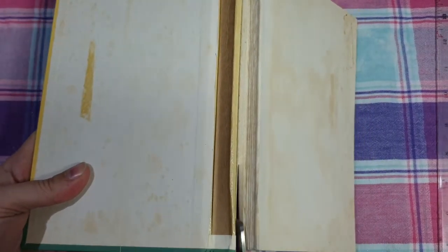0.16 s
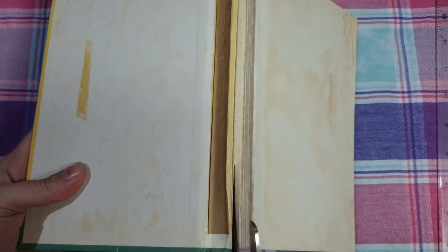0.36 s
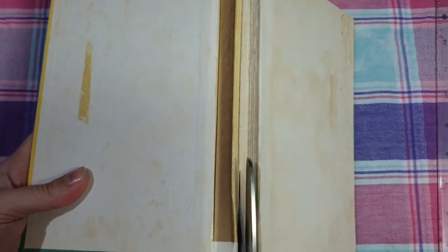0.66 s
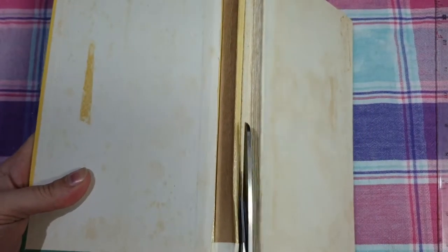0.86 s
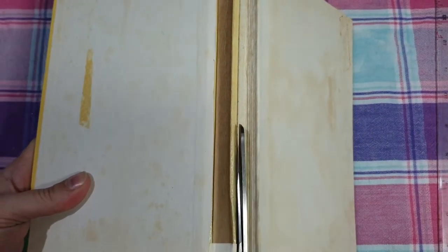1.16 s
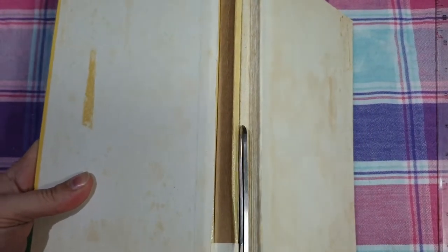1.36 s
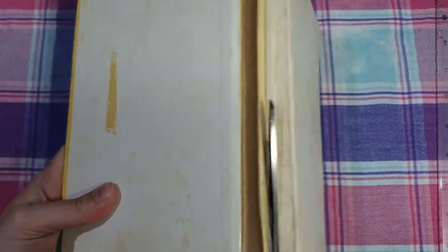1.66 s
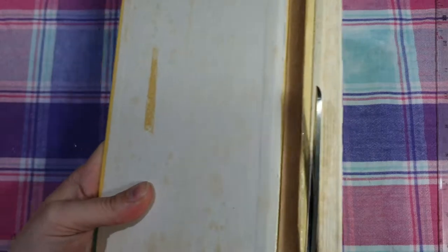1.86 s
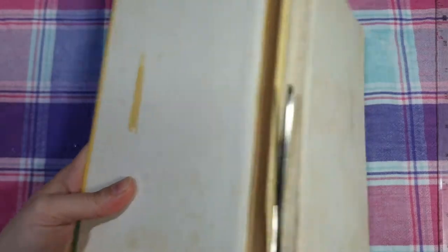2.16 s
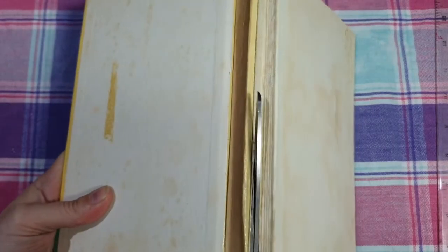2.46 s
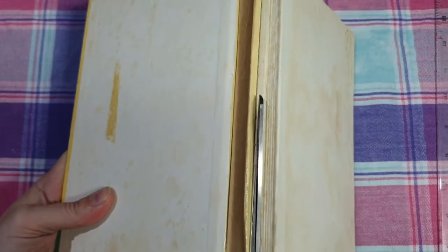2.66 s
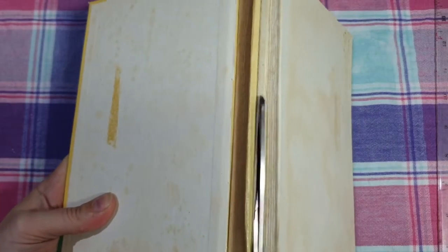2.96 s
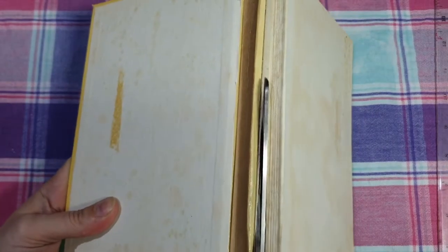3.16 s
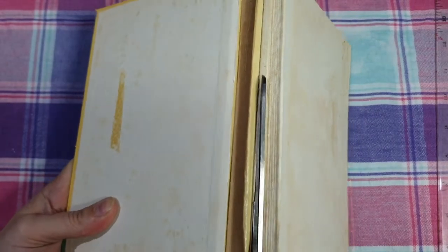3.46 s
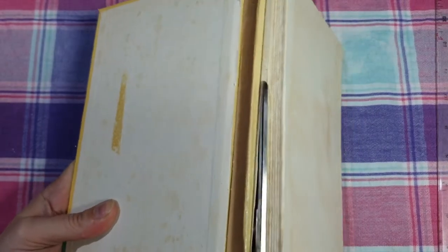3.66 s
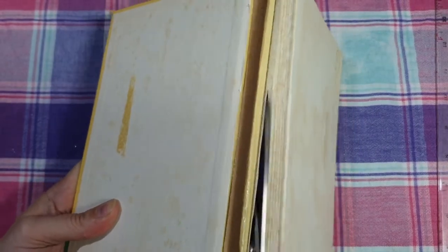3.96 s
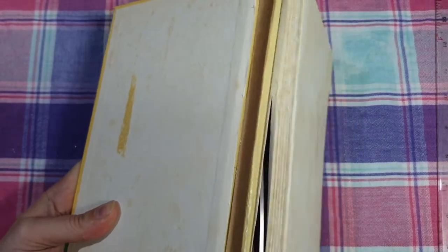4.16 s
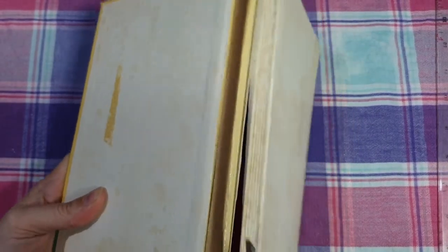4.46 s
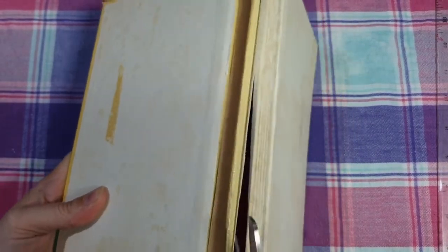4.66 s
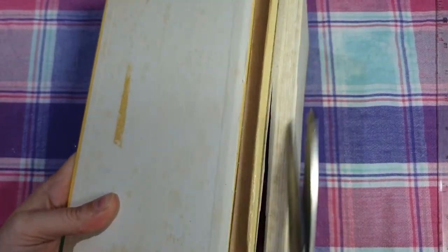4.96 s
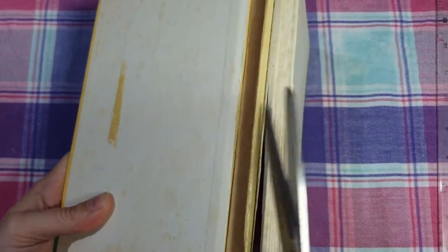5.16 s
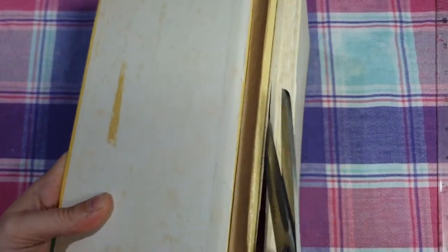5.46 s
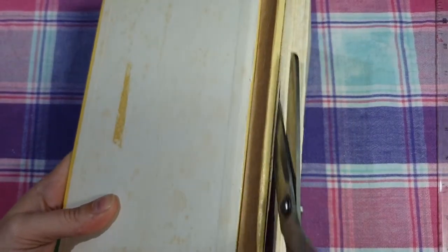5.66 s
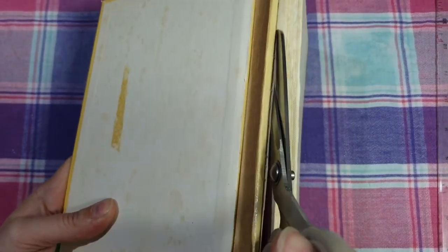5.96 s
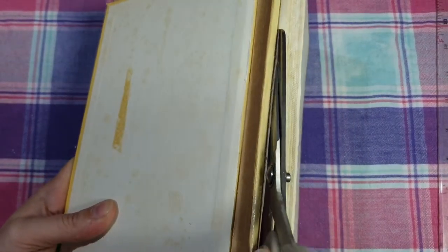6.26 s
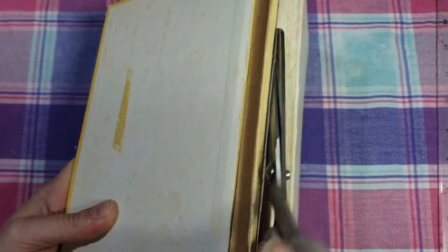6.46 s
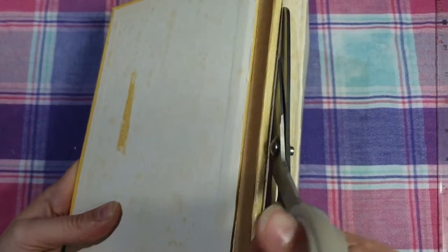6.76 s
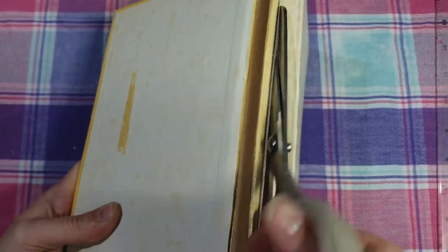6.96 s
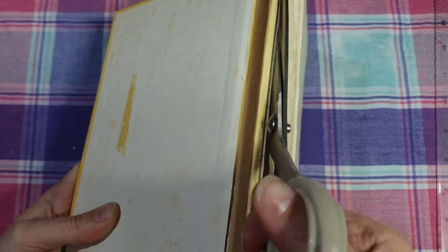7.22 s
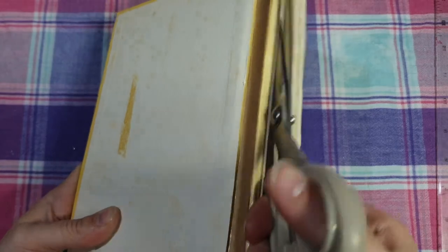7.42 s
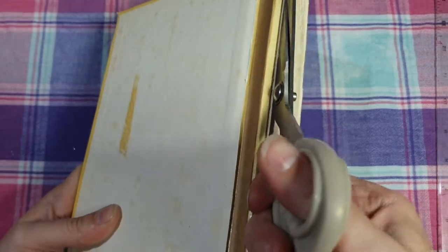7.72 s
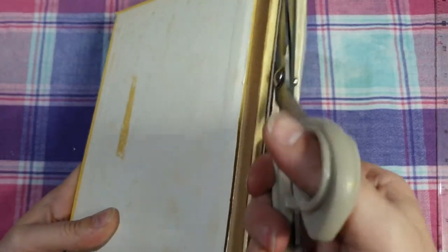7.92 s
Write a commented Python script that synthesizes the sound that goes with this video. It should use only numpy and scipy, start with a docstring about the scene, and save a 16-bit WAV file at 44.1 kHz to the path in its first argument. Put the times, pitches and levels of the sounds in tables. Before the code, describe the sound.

Close up, steel blades slide against paper and clack lightly, then bite into a book's binding with dry, slightly hollow crunches. The scissor cuts come in uneven bursts, separated by raspy sliding, faint breathy whistles and soft knocks from the book. After a short lull past the middle, several more crisp cuts follow. The room is small and quiet, with a faint low hum.

```python
"""A small quiet room with a low hum; a two-port microphone stands close to a cloth-covered table.
Scissors work along the spine of an open hardback held over it. Glue, threads and paper snap in short
crunches that ring the cover boards and the gutter. Between cuts the blades rub along the pages,
at times with a thin whistle; now and then they clack shut or the book jolts. The room answers briefly."""
import sys
import numpy as np
from scipy import signal
from scipy.fft import rfft, irfft, next_fast_len
from scipy.io import wavfile
from scipy.ndimage import uniform_filter1d

SR = 44100
rng = np.random.default_rng(int(sys.argv[2]) if len(sys.argv) > 2 else 0)


def dump_mix(stems):
    """Bounce the given channels to the path in sys.argv[1] as a 16-bit WAV at rate SR."""
    frames = np.atleast_2d(stems).T  # one column per channel
    limited = np.clip(frames, -1, 1)  # hard clip at full scale
    pcm = np.round(limited * 32767).astype(np.int16)
    wavfile.write(sys.argv[1], SR, pcm)


N = 356769

# fibres giving way: start_s, level_db, edge_db (re level), strongest_ring_hz
SNAPS = [(0.313, -31, -24, 560), (0.329, -34, -30, 600), (1.34, -39.5, -38, 915), (1.365, -36, -33, 894),
         (1.394, -26, -34, 1100), (1.402, -27, -34, 1100), (1.414, -33, -30, 900), (1.433, -17, -35, 1120),
         (1.452, -20.5, -40, 1350), (1.471, -25.5, -28, 1110), (1.502, -23, -29, 900),
         (1.51, -26, -32, 1100), (2.609, -43, -27, 1040), (2.644, -38, -26, 1020), (2.659, -38, -27, 1640),
         (2.683, -30, -31, 680), (2.751, -32.5, -42, 662), (2.765, -35, -28, 800), (2.779, -33.5, -41, 730),
         (2.821, -24.5, -34, 1340), (2.852, -30, -28, 684), (2.861, -33, -27, 1500),
         (2.88, -8.5, -42, 1470), (2.895, -22, -46, 1550), (2.905, -22.5, -29, 690), (2.935, -20, -34, 704),
         (3.389, -38, -25, 666), (3.411, -19, -35, 799), (3.601, -15, -29, 914), (3.646, -25, -36, 1630),
         (3.671, -21, -36, 830), (3.814, -37, -29, 1500), (4.228, -31.5, -49, 622),
         (4.503, -25.5, -27, 560), (4.525, -19.5, -47, 680), (4.564, -33, -45, 725), (5.033, -37, -45, 810),
         (5.102, -41, -13, 624), (5.163, -42, -34, 630), (5.453, -52, -48, 1470), (6.077, -14.5, -43, 1630),
         (6.197, -33.5, -27, 1500), (6.211, -42, -22, 2300), (6.342, -33, -32, 1250),
         (6.551, -37, -29, 2380), (6.568, -46, -27, 2300), (6.794, -41, -29, 673),
         (6.873, -13.5, -36, 1540), (6.902, -24, -39, 810), (7.239, -42, -37, 684), (7.309, -14, -39, 1600),
         (7.328, -26, -42, 1600), (7.339, -27, -34, 1500), (7.348, -17, -39, 805), (7.385, -28, -30, 1100),
         (7.391, -23, -34, 810), (7.411, -34, -29, 654), (7.428, -36, -27, 2160), (7.793, -22, -31, 800),
         (7.81, -29, -38, 900), (7.82, -25, -32, 921), (7.848, -23, -36, 1500), (7.869, -20, -31, 1370),
         (7.896, -24, -31, 1510), (7.909, -30.5, -26, 1500)]
# blades shutting through the spine: start_s, board_db, gutter_db, edge_db (both re board), strongest_ring_hz
CLACKS = [(0.762, -45, -13, -16, 595), (1.127, -48, 7, 6.5, 2100), (1.284, -68.5, 6, 14, 2180),
          (6.594, -37.5, -3, -19, 770)]
# resonances of cover boards, gutter, page edges and blades: pitch_hz, width_hz, level_db
BOARD_MODES = [(578, 38, -9), (686, 65, 1.5), (803, 62, 3.5), (900.5, 100, -4), (1090, 80, -9.5)]
GUTTER_MODES = [(1370, 61, -5.5), (1596, 130, 6), (1935, 220, -1), (2275, 230, -0.5), (2690, 210, -5)]
PAPER_MODES = [(3320, 700, -2), (4020, 430, -2.2), (4700, 830, 0), (5480, 660, 0), (6270, 1300, 0.5)]
BLADE_MODES = [(7120, 350, -4.5), (7563, 630, -1.5), (8170, 360, -8)]
# spectrum of the finest hiss: frequency_hz, level_db
AIR_SPECTRUM = [(6000, -28.5), (9500, 1.5), (14000, -2), (15500, -18.5)]


def undb(db):
    """Decibels to amplitude."""
    return 10 ** (np.asarray(db) / 20)


def unit(x):
    """Scale to rms 1."""
    return x / np.sqrt(np.mean(x ** 2))


def along(table):
    """Curves from rows of (time_s, values...), one value a sample."""
    times, *columns = np.transpose(table)
    return [np.interp(np.arange(N) / SR, times, column) for column in columns]


def shape(x, response):
    """Filter by a response given as a function of frequency."""
    size = next_fast_len(x.shape[-1], real=True)
    hz = np.fft.rfftfreq(size, 1 / SR) + 1
    return irfft(rfft(x, size) * response(hz), size)[..., :x.shape[-1]]


def colour(x, points):
    """Filter by a spectrum of (frequency_hz, level_db) points."""
    hz, db = np.transpose(points)
    return shape(x, lambda f: undb(np.interp(np.log(f), np.log(hz), db)))


def ring(x, modes, gains=1):
    """Drive damped resonances; the body radiates little above the highest and below the lowest."""
    hz, width, db = np.transpose(modes)[:, :, None]

    def response(f):
        peaks = undb(db) * gains / (1 + 1j * (f / hz - hz / f) * hz / width)
        return peaks.sum(0) / (1 + 1j * f / (1.3 * hz.max())) ** 2 / (1 - .7j * hz.min() / f)
    return shape(x, response)


def spot(modes, best_hz, scatter_db=1.2, focus_db=9.):
    """Gain of each resonance for one place on the book; those near best_hz answer most."""
    hz = np.transpose(modes)[0][:, None]
    nearness = np.exp(-(np.log(hz / best_hz) / .12) ** 2)
    return undb(scatter_db * rng.standard_normal(hz.shape) + focus_db * nearness)


def walk(rate_hz):
    """Random levels, held and smoothed twice; spread near 1."""
    hold = int(SR / rate_hz)
    steps = np.repeat(rng.standard_normal(N // hold + 1), hold)
    return 1.3 * uniform_filter1d(uniform_filter1d(steps, hold), hold)[:N]


def grit(count, apart, grain_db=0.):
    """Noise with uneven grains; apart is the share of power unrelated between the ports."""
    both, left, right = rng.standard_normal((3, count))
    grains = undb(grain_db * rng.exponential(size=count))
    return grains * (np.sqrt(1 - apart) * both + np.sqrt(apart) * np.array([left, right]))


def burst(size, decay_s, apart, rise_s=0.0021):
    """Coarse noise that builds fast and dies away, as when fibres let go together."""
    t = np.arange(size) / SR
    return grit(size, apart, grain_db=3.18) * (1 - np.exp(-(t / rise_s) ** 2)) * np.exp(-t / decay_s)


def room_tone(level_db=-67.5):
    """A nearly steady low hum under a faint rustle that comes and goes."""
    # the room at rest: frequency_hz, level_db
    spectrum = [(20, -30.5), (36, -16.5), (53, 1.5), (75, -12.5), (100, -12), (196, -24), (330, -30),
                (560, -32), (9000, -38.5), (15000, -36)]
    tone = undb(level_db) * unit(colour(grit(N, apart=0.061), spectrum))
    hum = colour(tone, [(150, 0), (300, -60)])
    rustle = tone - hum
    return undb(0.96 * walk(3)) * hum + undb(2.4 * walk(9.8)) * rustle


def room_tail(x, t60_s=0.19, level_db=-8.5, size=22050):
    """The small room returns a short diffuse tail, different at each port."""
    t = np.arange(size) / SR
    tail = rng.standard_normal((2, size)) * 1000 ** (-t / t60_s) * (1 - np.exp(-t / 0.012))
    tail = colour(tail, [(100, -9.5), (2000, -11.5), (15000, -4)])
    tail /= np.sqrt(np.sum(tail ** 2, axis=1, keepdims=True))
    return undb(level_db) * signal.fftconvolve(x.mean(0)[None], tail, axes=1)[:, :N]


def knocks(size=16384):
    """The whole book jolts against hand and table."""
    # jolts of the book: start_s, level_db, thump_db (table re book)
    jolts = [(2.204, -54, -5), (2.871, -60, -5), (3.634, -56, -6), (4.223, -72, -2), (4.513, -54, -3),
             (5.094, -68.5, -5), (5.978, -75, -8), (6.074, -66, -2), (6.352, -59.5, -7), (6.874, -65.5, -5),
             (7.234, -71.5, -5), (7.333, -62, -3), (7.859, -67, 4)]
    # resonances of book and table: pitch_hz, width_hz, level_db
    book_modes = [(223, 60, -1.6), (305, 70, 0), (380, 23, -0.4)]
    table_modes = [(72, 10, 0), (120, 20, 2)]
    out = np.zeros((2, N + size))
    for start_s, db, thump_db in jolts:
        jolt = burst(size, decay_s=0.019, apart=.1)
        book, table = unit(ring(jolt, book_modes)), unit(ring(jolt, table_modes))
        i = int(start_s * SR)
        out[:, i:i + size] += undb(db) * (book + undb(thump_db) * table)
    return out[:, :N]


def whistle(width_hz=180.):
    """Gliding blades sound a narrow, breathy band whose pitch depends on their opening."""
    # whistling glides: start_s, end_s, start_db, end_db, pitch_hz
    glides = [(0.0, 0.3, -64, -67.5, 1365), (3.05, 3.3, -55, -78, 1572), (3.815, 3.87, -54, -74, 1485),
              (5.7, 5.985, -82, -65, 1550), (6.63, 6.86, -68, -66, 1430), (6.95, 7.07, -74, -71, 1340),
              (7.11, 7.26, -70, -67, 1520), (8.02, 8.09, -60, -60, 1505)]
    points = []
    for start, end, start_db, end_db, hz in glides:
        points += [(start - .02, -99, hz), (start, start_db, hz), (end, end_db, hz), (end + .01, -99, hz)]
    level_db, pitch_hz = along(points)
    skirt = [(1, 0), (width_hz / 2, -3), (2 * width_hz, -40)]
    phase = 2 * np.pi * np.cumsum(pitch_hz) / SR
    band = sum(colour(grit(N, apart=.2), skirt) * wave(phase) for wave in (np.sin, np.cos))
    return undb(level_db) * unit(band)


def slot(x, echo_gain=.4):
    """An echo between blade and page hollows the hiss into bands that shift as the blade tilts."""
    # echo path in the slot: time_s, round_trip_ms
    round_trips = [(0.0, .4), (0.83, .54), (1.0, .47), (1.75, .52), (1.87, .56), (3.12, .545), (4.5, .33),
                   (5.72, .47), (5.8, .55), (5.98, .545), (8.09, .28)]
    delay_ms = along(round_trips)[0] * (1 + .03 * walk(15))
    at = np.arange(N)
    echo = np.array([np.interp(at - delay_ms * SR / 1000, at, port) for port in x])
    return (x + echo_gain * echo) / np.hypot(1, echo_gain)


def rub(bite_s=0.0032, swell_s=0.013, lift_s=0.0096, creep_db=11, size=8192):
    """Steel drags unevenly over paper and is heard through pages, boards, gutter, blades and air."""
    # blades sliding in the spine: start_s, firmest_s, end_s, rasp_db (at firmest), fade_db (to the end),
    # depth_db (in the binding, re rasp), sheen_db (of the steel, re rasp)
    strokes = [(0.0, 0.0, 0.072, -62, 16.5, -2, -1), (0.14, 0.31, 0.312, -66.5, 0, 1, 0),
               (0.321, 0.321, 0.391, -47.5, 30, 0, -9), (0.49, 0.49, 0.56, -76, 2, 0, 3),
               (0.682, 0.682, 0.768, -70, 0, 2, 4), (0.765, 0.765, 0.823, -56, 10.5, -4, -7),
               (0.815, 0.85, 1.011, -57, 15, -12, 9.5), (1.14, 1.14, 1.193, -46.5, 15.5, 0, -10),
               (1.296, 1.296, 1.417, -67, 0, 1, -4), (1.429, 1.429, 1.537, -55, 10, 7, 0),
               (1.607, 1.607, 1.732, -63, 2.5, 3, -4), (1.71, 1.812, 1.872, -50, 8, -10, 7),
               (1.914, 1.914, 2.088, -67, 0, 5, -3), (2.195, 2.222, 2.279, -38.5, 31, 12, -25),
               (2.3, 2.3, 2.62, -82, 0, 9, 4), (2.644, 2.644, 2.79, -67, 0, 14, 8),
               (2.806, 2.954, 2.956, -59.5, 0, 5, -7), (3.03, 3.14, 3.265, -62.5, 14, 5, 9),
               (3.388, 3.388, 3.466, -63, 14.5, 10, -1), (3.596, 3.596, 3.686, -49.5, 7, 8, 2),
               (3.794, 3.794, 3.867, -65.5, 9, 3, 4), (3.9, 4.066, 4.068, -76, 0, 4, 6),
               (4.063, 4.063, 4.217, -61.5, 11, 3, 1), (4.196, 4.196, 4.36, -63, 0, 6, -4),
               (4.358, 4.358, 4.511, -57.5, 6, -4, -1), (4.508, 4.508, 4.624, -49, 11.5, -2, -3),
               (4.639, 4.784, 4.786, -65, 0, 5, -3), (4.793, 5.03, 5.041, -55, 0, 0, -3),
               (5.095, 5.095, 5.211, -61, 15, -8, -4), (5.69, 5.72, 5.77, -65, 3, -10, 5),
               (5.77, 5.81, 5.985, -61, 4, -10, 5), (6.08, 6.08, 6.126, -57.5, 22.5, 9, 0),
               (6.208, 6.208, 6.279, -63.5, 16.5, -1, 5), (6.336, 6.365, 6.4, -52, 7, 10, 1),
               (6.6, 6.6, 6.669, -54.5, 11, -1, 0), (6.718, 6.718, 6.862, -72, 5, -1, 3),
               (6.877, 6.877, 6.954, -51, 24, 7, -3), (7.09, 7.09, 7.286, -60, 18.5, -5, 4),
               (7.307, 7.307, 7.422, -45, 7, 2, -4), (7.529, 7.529, 7.706, -53.5, 14, -4, 0),
               (7.758, 7.778, 7.914, -52.5, 1, 9, 0), (7.994, 7.994, 8.08, -59, 0, -4, 3)]
    # where the blades rest: from_s, lean_db (board over gutter), strongest_ring_hz
    leans = [(0.0, 3, 1370), (0.6, -5, 1600), (1.0, -4, 2275), (1.25, -5, 1090), (2.1, -2, 1090),
             (2.25, 3, 700), (2.8, -5, 1600), (3.0, 4, 800), (3.35, -6, 1600), (3.85, 8, 800),
             (4.35, -1, 800), (4.6, 4, 2480), (4.79, 0.5, 2480), (5.07, 8, 690), (5.5, -3, 5480),
             (6.05, -4, 1600), (7.3, -2, 800), (7.74, 1, 800)]
    # how sheen drives blade, then air: offset_db, db_per_sheen_db
    sheen_drive = [(0.5, 1.15), (-1.5, .85)]
    binding, rasp = np.zeros((2, 2, N + size))
    flicker = undb(2.18 * np.array([walk(30) for _ in range(5)]))
    flicker = np.pad(flicker, [(0, 0), (0, size)], mode="edge")
    lumps = np.pad(walk(110), (0, size))
    drags = [grit(N + size, apart=.35, grain_db=1.5) for _ in range(4)]
    hiss = grit(N + size, apart=.5, grain_db=1.5)
    cuts_s = np.array([row[0] for row in SNAPS + CLACKS])
    for start, firmest, end, db, fade_db, depth_db, sheen_db in strokes:
        i = np.arange(int(start * SR), int((end + .08) * SR))
        t = i / SR
        # a stroke set off by a snap or clack bites at once, the others creep in
        attack_s = bite_s if np.abs(cuts_s - start).min() < .016 else swell_s
        contact = np.clip((t - start) / attack_s, 0, 1) * np.exp(-np.maximum(t - end, 0) / lift_s)
        slack = np.clip((firmest - t) / max(firmest - start, .02), 0, 1)
        fading = np.clip((t - firmest) / max(end - firmest, .005), 0, 1)
        # cutting deep in the binding goes in lumps; gliding on paper is smoother
        crunch_db = np.clip(1.6 + 0.27 * depth_db, 1, 4.5) * np.minimum(lumps[i], 1)
        pressure = contact * undb(db - creep_db * slack - fade_db * fading + crunch_db)
        _, lean_db, best_hz = [row for row in leans if row[0] <= start][-1]
        paths = [ring(drag[:, i], modes, spot(modes, best_hz, scatter_db=3.0, focus_db=10.5))
                 for drag, modes in zip(drags, (PAPER_MODES, BOARD_MODES, GUTTER_MODES, BLADE_MODES))]
        paths.append(colour(hiss[:, i], AIR_SPECTRUM))
        paths_db = [0, depth_db + lean_db / 2, depth_db - lean_db / 2]
        paths_db += [offset + slope * sheen_db for offset, slope in sheen_drive]
        paper, board, gutter, blade, air = (undb(path_db) * pressure * uneven[i] * unit(path)
                                            for path_db, uneven, path in zip(paths_db, flicker, paths))
        binding[:, i] += board + gutter
        rasp[:, i] += paper + blade + air
    return binding[:, :N] + slot(rasp[:, :N])


def edge_tick(x, blade_db, air_db):
    """The bright top of a cut: page edges and blades ring under the finest hiss."""
    paper, blade = unit(ring(x, PAPER_MODES)), unit(ring(x, BLADE_MODES))
    return paper + undb(blade_db) * blade + undb(air_db) * unit(colour(x, AIR_SPECTRUM))


def clacks(size=4096):
    """The blades shut in one sharp blow that rings boards and gutter and spits a wide tick."""
    out = np.zeros((2, N + size))
    for start_s, db, gutter_db, edge_db, best_hz in CLACKS:
        blow = burst(size, decay_s=0.0009, apart=.15, rise_s=.0005)
        edge = edge_tick(blow, blade_db=-1.0, air_db=1.5)
        board, gutter = (unit(ring(blow, modes, spot(modes, best_hz, focus_db=16.)))
                         for modes in (BOARD_MODES, GUTTER_MODES))
        i = int(start_s * SR)
        out[:, i:i + size] += undb(db) * (board + undb(gutter_db) * gutter + undb(edge_db) * edge)
    return out[:, :N]


def snaps(gutter_db=-29, brighter_from_s=6.0, size=4096):
    """Short tears in glue, thread and paper ring boards and gutter and crack with a bright edge."""
    out = np.zeros((2, N + size))
    for start_s, db, edge_db, best_hz in SNAPS:
        tear = burst(size, decay_s=0.0032, apart=0.22)
        edge = edge_tick(tear, blade_db=6.5, air_db=3.4 if start_s > brighter_from_s else 0.4)
        board, gutter = (unit(ring(tear, modes, spot(modes, best_hz)))
                         for modes in (BOARD_MODES, GUTTER_MODES))
        board_db = -25.5 - 8 * np.log2(best_hz / 700)  # the boards answer a higher tear less
        snap = undb(board_db) * board + undb(gutter_db) * gutter + undb(edge_db) * edge
        i = int(start_s * SR - 40)  # the tear builds for a moment before it is heard
        out[:, i:i + size] += undb(db) * snap
    return out[:, :N]


def scene():
    """Scissors and book close up, the room behind them."""
    near = snaps() + clacks() + knocks() + rub() + whistle()
    return near + room_tail(near) + room_tone()


def record(dry, top_hz=14700):
    """The microphone's two ports differ in colour and phase, and the top is cut."""
    # left port against right: frequency_hz, level_db, lead_rad
    port_balance = [(60, 1.5, 0.05), (250, 2.5, .1), (606, 4, .3), (1190, 2.9, 0.85), (4000, 2.1, 0.96),
                    (7550, -2.5, 1.2), (10900, -1.2, 1.39), (15200, 1.9, 1.1)]
    hz, db, lead_rad = np.transpose(port_balance)

    def response(f):
        tilt_db, phase = (np.interp(np.log(f), np.log(hz), column) for column in (db, lead_rad))
        left = np.sqrt(undb(tilt_db) * np.exp(1j * phase))
        return np.array([left, 1 / left])
    lowpass = signal.ellip(10, .2, 60, top_hz, fs=SR, output="sos")
    return signal.sosfilt(lowpass, shape(dry, response))


dry = scene()
out = record(dry)
dump_mix(out)
```